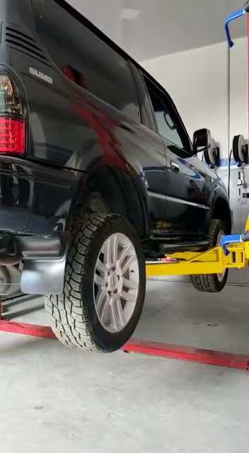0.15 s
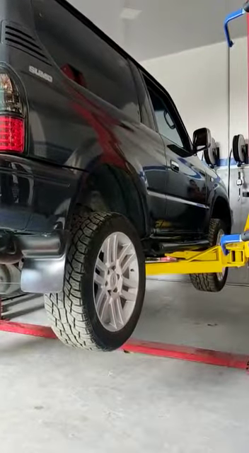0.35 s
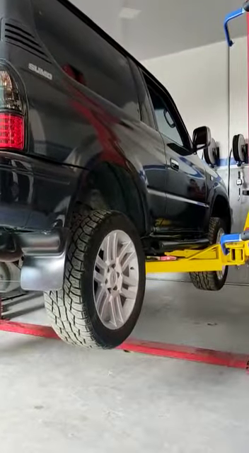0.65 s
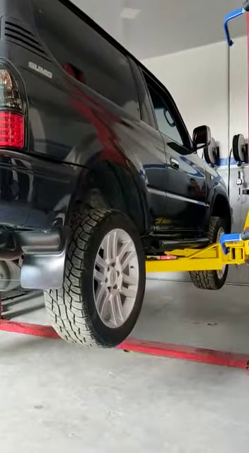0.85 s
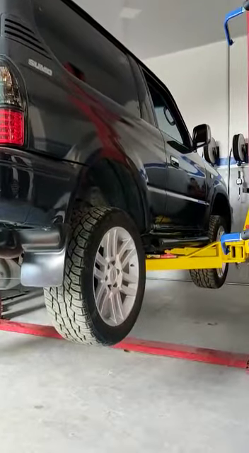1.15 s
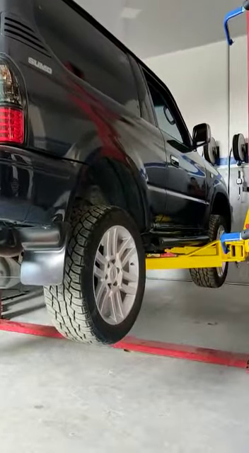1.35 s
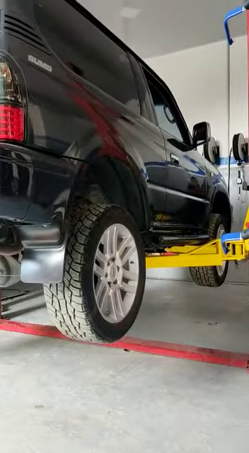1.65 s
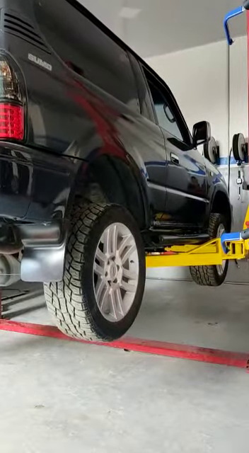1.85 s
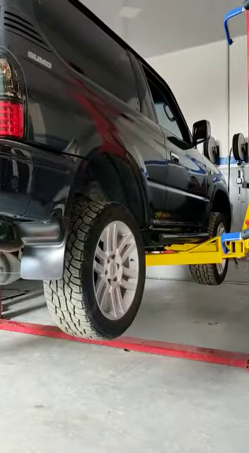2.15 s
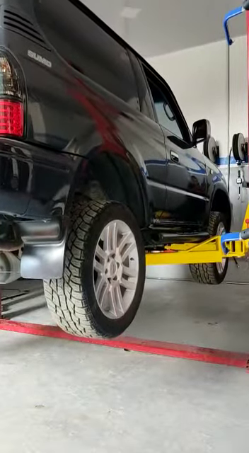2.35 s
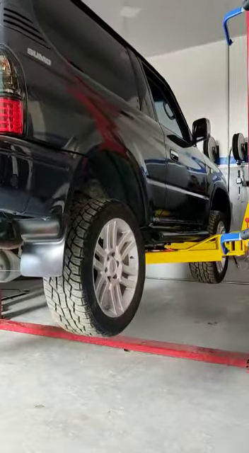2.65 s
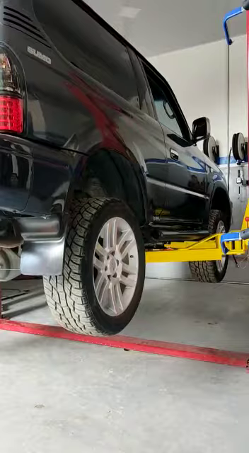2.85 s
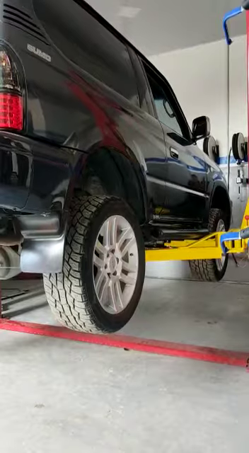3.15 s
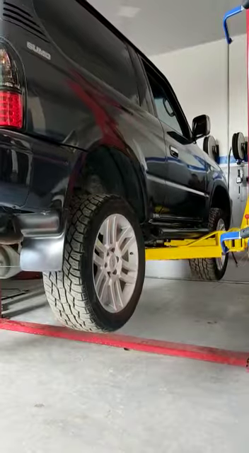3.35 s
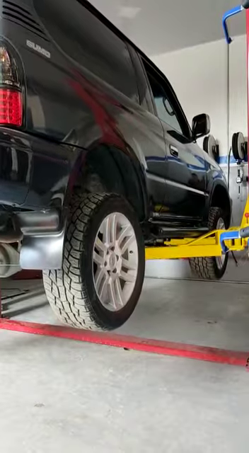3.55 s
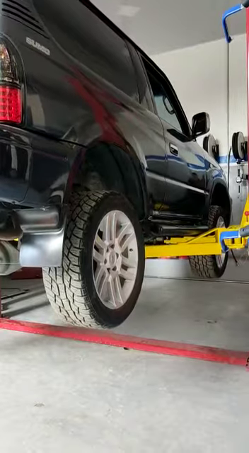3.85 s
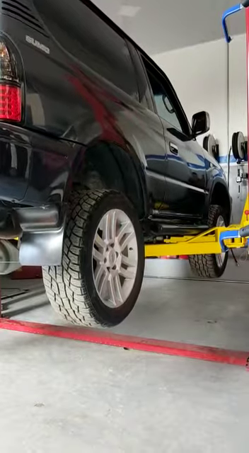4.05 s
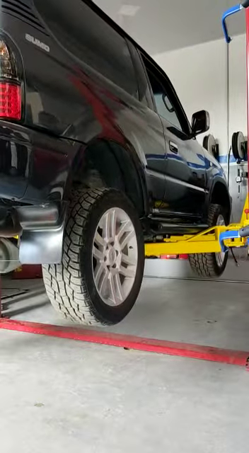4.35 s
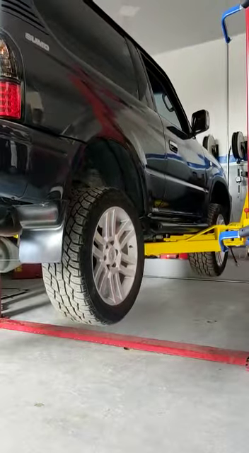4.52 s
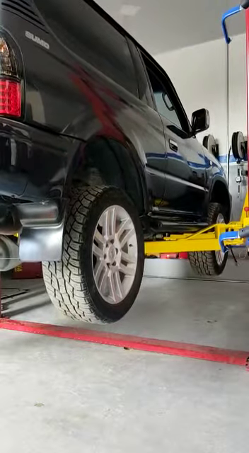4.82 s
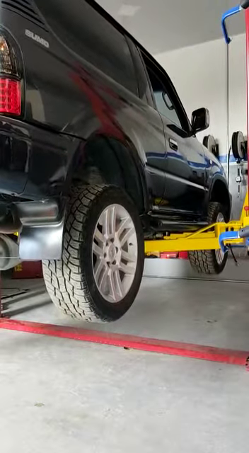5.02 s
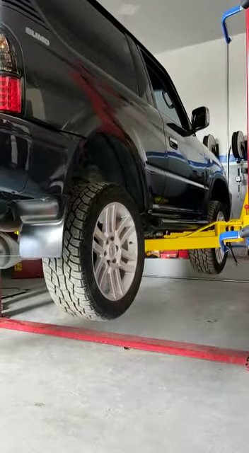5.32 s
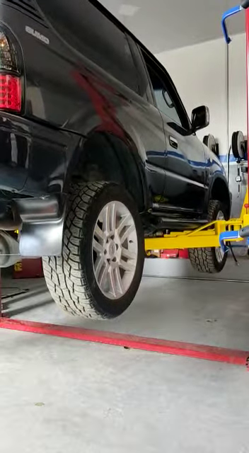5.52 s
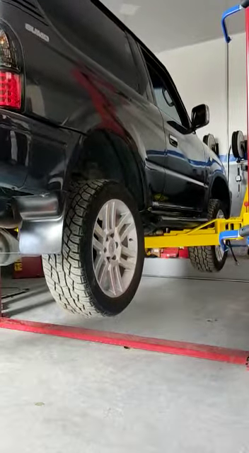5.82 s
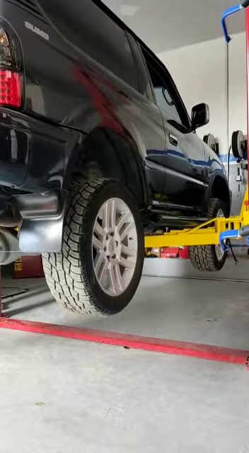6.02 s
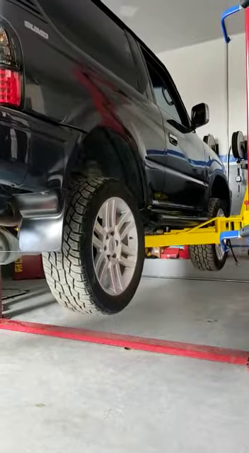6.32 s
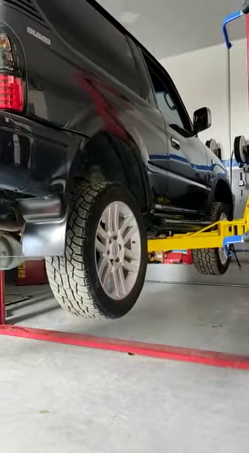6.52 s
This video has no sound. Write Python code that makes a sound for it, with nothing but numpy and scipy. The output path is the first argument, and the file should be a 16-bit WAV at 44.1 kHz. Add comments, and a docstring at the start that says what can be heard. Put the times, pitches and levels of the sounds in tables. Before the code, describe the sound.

A car lift rises in a hard-walled workshop. Throughout, an electric motor hums at low pitch, and its hydraulic gear pump whines steadily around 530 Hz with rough, shrill harmonics up to about 7 kHz and a rushing oil hiss; the tone shimmers and shifts gently between left and right. At 0 s the ring of an earlier clank is dying away, with a soft puff of air on the microphone. Around 1.4 s a thin, very high squeal slips past, faint and leaning left. At 1.93 s a sharp steel latch clank cracks loudly, answered at 2.15 s by the other post, both ringing and echoing for about a second. The pair repeats at 4.44 and 4.67 s. Each blow briefly pushes the whine down before it recovers. Low wind rumble comes and goes, with a bump near 3.9 s and a flurry of buffets from 5.9 to 6.4 s, still rumbling strongly at the end.

```python
"""In a hard-walled workshop, a two-post car lift raises a vehicle.
A draught buffets the microphone: noise shaped by gust curves. A sliding guide squeals once: a rough sine.
The induction motor hums at multiples of 120 Hz; its nine-tooth gear pump whines at multiples of the shaft rate.
About every 2.5 s each post's safety latch drops into a notch: noise cracks, ringing column modes and a hall tail.
Gain control ducks whatever is loud, the clanks most of all."""
import sys
import numpy as np
from scipy import signal
from scipy.fft import rfft, irfft
from scipy.io import wavfile
from scipy.ndimage import uniform_filter1d, minimum_filter1d

SR = 44100
rng = np.random.default_rng(int(sys.argv[2]) if len(sys.argv) > 2 else 0)


def generate_wav(sig):
    """Save sig (samples, or channels by samples) to the path in sys.argv[1] as 16-bit PCM at SR."""
    pcm = np.round(np.clip(np.atleast_2d(sig).T, -1, 1) * 32767).astype(np.int16)
    wavfile.write(sys.argv[1], SR, pcm)


N = 294588
TIME = np.arange(N) / SR


def amp(db):
    """Decibels to gain."""
    return 10 ** (np.asarray(db) / 20)


def unit(x):
    """Scales to rms 1."""
    return x / np.sqrt(np.mean(abs(x) ** 2) + 1e-20)


def read(points, hz):
    """Reads a table on a log-frequency axis."""
    f, value = np.transpose(points)
    return np.interp(np.log(hz + 1), np.log(f + 1), value)


def follow(points, t):
    """Reads each column of a table of curves at the times t."""
    s, *columns = np.transpose(points)
    return [np.interp(t, s, column) for column in columns]


def add(mix, s, sound):
    """Mixes a stereo sound in at time s."""
    part = mix[:, max(round(s * SR), 0):][:, :sound.shape[1]]
    part += sound[:, :part.shape[1]]


def drift(rate_hz):
    """Smooth random wander of rms 1, fading out above about the given rate."""
    size, slow_rate = 4096, 400  # samples, samples per second
    hz = np.fft.rfftfreq(size, 1 / slow_rate)
    slow = irfft(rfft(rng.standard_normal(size)) * np.exp(-(hz / rate_hz) ** 2))
    return np.interp(TIME, np.arange(size) / slow_rate, unit(slow))


# balance of the two microphone ports: pitch_hz [Hz], left_over_right_db [dB]
PORT_BALANCE = [(30, -1), (150, -5), (400, 1), (1200, 1), (2700, 1.5), (4200, -4.5), (5800, -0.5),
                (6800, -3), (7400, -12.5), (8000, 5), (8700, 17), (12000, 6)]
# how alike the ports hear diffuse noise: pitch_hz [Hz], likeness [0 to 1]
PORT_LIKENESS = [(30, 0.36), (130, 0.23), (220, 0.42), (500, 0.35), (1000, 0), (16000, 0)]


def noise(spectrum, size=N):
    """Diffuse noise with the given density, as the two ports pick it up."""
    hz = np.fft.rfftfreq(size, 1 / SR)
    first, other = rfft(rng.standard_normal((2, size)))
    same = read(PORT_LIKENESS, hz)
    pair = np.array([first, same * first + np.sqrt(1 - same ** 2) * other])
    pair = pair * amp(np.outer([.5, -.5], read(PORT_BALANCE, hz)))
    return irfft(pair * amp(read(spectrum, hz)), size) * np.sqrt(SR / 2)


# strength of the draught, before its trim and random gusts: start_s [s], level_db [dB]
DRAUGHT_STRENGTH = [(0, -43), (.65, -37), (1.3, -42.5), (1.7, -33), (2.25, -34.5), (2.5, -31), (2.7, -37),
                    (3.7, -35.5), (3.92, -27.5), (4.8, -43.5), (5.4, -33.5), (5.9, -34), (6.25, -30),
                    (6.68, -25.5)]
# colour of the rumble, scaled to rms 1 before use: pitch_hz [Hz], density_db [relative dB per Hz]
RUMBLE_COLOUR = [(10, 1.5), (25, -10), (60, 2), (120, -2.5), (190, 1), (300, -6.5), (600, -18.5),
                 (1500, -111)]
# sharper buffets: peak_s [s], level_db [dB], length_s [s from the peak to 1/e]
BUFFET_TIMES = [(0.055, -17, 0.0074), (0.232, -30, 0.048), (0.68, -26, 0.033), (0.992, -25, 0.045),
                (1.112, -25, 0.017), (2.536, -29, 0.06), (3.02, -26, 0.09), (3.515, -25, 0.032),
                (3.906, -24, 0.073), (4.172, -29.5, 0.11), (5.346, -30, 0.039), (5.524, -25, 0.038),
                (5.66, -26, 0.0091), (5.915, -22.5, 0.012), (6.203, -20.5, 0.015), (6.238, -20, 0.01),
                (6.27, -18, 0.011), (6.307, -15, 0.007), (6.357, -15, 0.013), (6.383, -20, 0.008),
                (6.602, -28, 0.04)]
# colour of a buffet, scaled to rms 1 before use: pitch_hz [Hz], density_db [relative dB per Hz]
BUFFET_COLOUR = [(15, 2.5), (60, -4.5), (180, 1), (300, -5), (550, -12.5), (900, -24.5), (2000, -75)]
# upper part of a quick buffet, scaled to rms 1 before use: pitch_hz [Hz], density_db [relative dB per Hz]
SNAP_COLOUR = [(30, -25), (200, -3), (450, 1), (750, -8), (1100, -14), (2000, -55)]


def draught(rumble_db=1, gust_db=2.5, gust_hz=6, lumpy_db=2, snap_db=-6, snap_s=0.019):
    """Moving air rumbles in random gusts, lumpy at each port; quicker eddies reach higher."""
    gusts_db = follow(DRAUGHT_STRENGTH, TIME)[0] + gust_db * drift(gust_hz)
    port_lumps_db = lumpy_db * np.array([drift(41), drift(28)])
    rumble = unit(noise(RUMBLE_COLOUR)) * amp(rumble_db + gusts_db + port_lumps_db)
    eddies, snaps = np.zeros((2, N))
    for s, db, length in BUFFET_TIMES:
        eddy = amp(db) * np.exp(-((TIME - s) / length) ** 2)
        eddies += eddy
        snaps += eddy / (1 + (length / snap_s) ** 2)  # the shorter the eddy, the more snap
    buffets = unit(noise(BUFFET_COLOUR)) * eddies
    return rumble + buffets + unit(noise(SNAP_COLOUR)) * amp(snap_db) * snaps


# one thin squeal of a sliding guide, before roughness and panning:
# peak_s [s], pitch_hz [Hz], level_db [dB peak], rise_s [s, time constant], fade_s [s, time constant]
GUIDE_SQUEAL = (1.43, 11480, -34, .055, .07)


def squeal(width_hz=110, rough_db=3, glide_hz=350, glide_s=0.055):
    """A rough, very high friction tone that slips down onto its pitch as it swells, then fades."""
    s, hz, db, rise_s, fade_s = GUIDE_SQUEAL
    t = TIME - s
    glide = glide_hz * np.clip(-t / glide_s - 1, 0, 1)  # lands glide_s before the peak
    pitch = hz + glide + width_hz * drift(140)
    tone = np.sin(2 * np.pi * np.cumsum(pitch) / SR)
    envelope = np.exp(np.minimum(t / rise_s, -t / fade_s))
    return tone * envelope * amp(db + rough_db * drift(70)) * amp([[3], [-3]])


# magnetic hum of the motor, before its swells:
# pitch_hz [Hz], level_db [dB], left_over_right_db [dB], port_phase_rad [rad]
HUM_LINES = [(240, -35.5, 3.5, 0.47), (360, -51, 12.5, 0.56), (480, -37, 0.5, 1.5), (600, -41.5, 6, 1.43)]
# swell of each hum line in turn: start_s [s], line_1_db [dB], line_2_db [dB], line_3_db [dB], line_4_db [dB]
HUM_LINE_SWELLS = [(0, 0.79, 0, -3, -9), (.6, 0.49, 0, 2, -13), (1.3, 0.63, 0, -6.5, 0),
                   (1.8, 1, 0, -9, -1), (2.7, 0.77, 0.006, 1.5, 1.5), (3.1, -2.5, 0, -4, -2),
                   (3.8, 2.1, 0, -1.5, 2), (4.3, 0, 0, 3, 1.5), (5.2, -1.03, 0, 4, -2), (5.6, -2, 0, 3, 0),
                   (6.1, -0.23, 0.0055, 3, -17), (6.6, -1.6, 0, 4.5, -3)]


def motor(waver=0.089, wander_rad=0.084, drift_hz=2.5):
    """The stator hums at even multiples of the mains; the lines swell and waver slowly in the room."""
    out = np.zeros((2, N))
    for (hz, db, pan, lag), swell_db in zip(HUM_LINES, follow(HUM_LINE_SWELLS, TIME)):
        *port_waver, wander = [drift(drift_hz) for _ in range(3)]
        phase = 2 * np.pi * (hz * TIME + rng.random()) + wander_rad * wander
        for ear, side in enumerate((.5, -.5)):
            level = np.sqrt(2) * amp(db + swell_db + side * pan) * (1 + waver * port_waver[ear])
            out[ear] += level * np.cos(phase + side * lag)
    return out


SHAFT_HZ, TEETH = 58.93, 9
# pump whine before trim and swells, one row for each multiple of the tooth rate from the first up:
# nine level_db [dB], from four shaft orders below the multiple to four above, then left_over_right_db [dB]
WHINE_ORDERS = [(-60, -60, -48, -43.5, -33.5, -42.5, -76, -62, -61, 3),
                (-55, -54, -57, -50.5, -47.5, -61, -73, -63, -72, 1.5),
                (-85, -62, -53, -56.5, -43.5, -62, -60, -54, -74, 1),
                (-58, -56, -54, -46.5, -51.5, -46.5, -48.5, -87, -69, 4),
                (-64, -49.5, -40.5, -32.5, -46.5, -42, -43.5, -52, -57, 5),
                (-54, -56, -59, -44, -49, -62, -62, -64, -80, 0),
                (-77, -78, -79, -59.5, -51, -71, -68, -84, -86, -3),
                (-79, -80, -77, -86, -55, -62.5, -81, -82, -78, 2),
                (-77, -80, -71, -52, -56.5, -54, -77, -79, -85, -16),
                (-78, -54, -65, -53, -49, -45.5, -57, -61, -64, -1),
                (-51, -46, -54, -37.5, -42, -37, -45.5, -51, -54, -3.5),
                (-48, -53, -63, -34.5, -43, -38.5, -42.5, -44, -51, -7.5),
                (-63, -41, -46, -33.5, -37.5, -33, -48, -45, -52, -8.5),
                (-54, -69, -52, -41, -47.5, -42, -50, -52.5, -61, -3.5),
                (-54, -65, -52, -57, -51, -62, -63, -51.5, -61, -6),
                (-66, -55, -78, -49.5, -48, -58, -59, -64, -62, 1),
                (-62, -53, -68, -57, -48, -54.5, -64, -54, -62, 9)]
# faint orders above those rows, before trim: pitch_hz [Hz], level_db [dB per line]
FAINT_ORDERS = [(9500, -67), (10000, -75), (11000, -67.5), (12500, -83)]
# the pump's tooth tone as the rising vehicle shifts the standing waves:
# start_s [s], level_db [relative dB], left_over_right_db [dB], port_phase_rad [rad]
TOOTH_TONE_PATH = [(.1,-2,1,-2),(.35,-12,10,-1),(.65,0,20,-3),(.9,-3.5,20,0),(1.5,-2.5,11,-7),(1.78,-2.5,4,-4.5),(2.75,0.5,-3,-2.5),(3,1.5,-3,-3),(3.25,2,-1,-3),(3.9,-2.5,-1,-2),(4.25,-3.5,-3,-2),(5.2,-6,10,-0.5),(5.5,-5,6,0),(5.9,2.5,8,0.2),(6.2,0.5,1,1.6),(6.55,-1,10,-1)]
# loud multiples of the tooth rate, near 2.6, 5.8, 6.4 and 6.9 kHz: multiple [count]
LOUD_TOOTH_MULTIPLES = (5, 11, 12, 13)
# swell of the whine around each of them in turn:
# start_s [s], first_db [dB], second_db [dB], third_db [dB], fourth_db [dB]
LOUD_SWELLS = [(0.1, 2.2, -4, 0.5, -6), (0.35, 2.5, -3.3, -1.5, -2.3), (0.65, 0.9, -4.2, 0.5, 1.5),
               (0.9, -2.1, -3.5, -1.13, -0.5), (1.2, 0.4, 0, 0.5, -1.5), (1.5, -0.7, 0, 1.47, 1.5),
               (1.78, 0.8, 2, 3.17, -4), (2.75, -2.7, -6.5, 1.47, 0), (3.0, 0.5, 3, 1.87, 0),
               (3.249, 0.5, 4.5, 3, 0), (3.6, 0, 1.5, -0.5, 3), (3.9, -1, 2.5, -0.63, 1.5),
               (4.25, -2, 2.5, -3, 3.5), (5.2, -3.7, 1.5, 1.5, 0), (5.5, -3, 0, -0.5, 0.5),
               (5.9, -1.2, -2.5, -3, 1.32), (6.25, 0.5, 4.5, -3, 0.5), (6.55, -2, 2.2, -3, -3.5)]
# oil rushing through the pump and valve, before its flutter: pitch_hz [Hz], density_db [dB per Hz]
OIL_HISS = [(30, -57), (120, -61.5), (220, -62), (350, -65), (520, -67.5), (800, -70), (1300, -72.5),
            (2600, -70.5), (3150, -71), (3500, -78.5), (4500, -83), (5700, -71), (7000, -70.5), (9100, -78),
            (10000, -88.5), (12000, -94), (15000, -116)]


def fading_path(hz, pan, depth, rate, path_rad, shimmer, port_lag):
    """Standing waves give a line a steady part, slow fading, a quick shimmer and a slowly turning phase."""
    chance = np.exp(2j * np.pi * rng.random((2, 2, len(rate))))
    right_phase = rng.choice([-1, 1]) * (port_lag + 0.79 * rng.standard_normal())
    steady = np.exp([[0], [1j * right_phase]]) * chance[0, 0, -1]
    slow = unit(np.fft.ifft(chance[0] * np.exp(-(rate / 3.6) ** 2)))
    fast = unit(np.fft.ifft(chance[1] / (1 + (rate / 22) ** 2)))
    turning = unit(np.fft.ifft(chance[1] * np.exp(-(rate / 1.16) ** 2)).real)
    path = unit(steady + depth * slow + np.sqrt(hz / 3500) * shimmer * fast)
    return path * unit(amp([[pan], [0]])) * np.exp(1j * path_rad * np.sqrt(hz / 7000) * turning)


def pump(wander=0.0002545, flutter=0.000371, fading=0.55, loud_fading=0.24, path_rad=0.68,
         shimmer=0.25, port_lag=1.5, whine_db=0.68):
    """Each tooth squeezes out a pulse of oil; uneven teeth add shaft sidebands, and the room fades the lines."""
    turns = np.cumsum(SHAFT_HZ * (1 + wander * drift(1.6) + flutter * drift(21.0))) / SR
    shaft = np.exp(2j * np.pi * turns).astype(np.complex64)
    hop = 256  # samples between the points of a path
    t = np.arange(N // hop + 2) * hop / SR
    tone_db, tone_pan, tone_lag = follow(TOOTH_TONE_PATH, t)
    swell_db = dict(zip(LOUD_TOOTH_MULTIPLES, follow(LOUD_SWELLS, t)))
    rate = np.fft.fftfreq(len(t), hop / SR)
    ramp = (np.arange(hop) / hop).astype(np.float32)
    out, line = np.zeros((2, N), np.float32), shaft ** 6
    for order in range(7, 210):
        line = line * shaft  # one shaft order higher
        tooth, hz = round(order / TEETH), order * SHAFT_HZ
        offset = order - tooth * TEETH
        if tooth <= len(WHINE_ORDERS):
            row = WHINE_ORDERS[tooth - 1]
            db, pan = row[offset + TEETH // 2], row[-1]
        else:
            db, pan = read(FAINT_ORDERS, hz), read(PORT_BALANCE, hz)
        if order == TEETH:  # the tooth tone itself is clean and moves slowly between the ports
            ports = np.array([amp(tone_pan), np.exp(-1j * tone_lag)])
            path = amp(tone_db) * ports / np.sqrt((1 + amp(tone_pan) ** 2) / 2)
        else:
            depth = loud_fading if tooth in LOUD_TOOTH_MULTIPLES else fading
            path = fading_path(hz, pan, depth, rate, path_rad, shimmer, port_lag)
        path = (np.sqrt(2) * path * amp(whine_db + db + swell_db.get(tooth, 0))).astype(np.complex64)
        smooth_path = path[:, :-1, None] + np.diff(path)[..., None] * ramp
        out += (smooth_path.reshape(2, -1)[:, :N] * line).real
    # the oil hisses in step with the shaft
    return out + noise(OIL_HISS) * (1 + 0.06 * shaft.real) * amp(.5 * drift(25))


def from_the_right(pair, share=0.088, delay_s=.0005):
    """Part of what meets the right port arrives at the left one a moment later."""
    late = np.pad(pair[1], (round(delay_s * SR), 0))[:pair.shape[1]]
    return np.array([np.sqrt(1 - share ** 2) * pair[0] + share * late, pair[1]])


def column_ring(modes, ring_db, tilt_db, size, scatter=0.44, beat_hz=7):
    """The steel column rings in decaying modes for one second; each has a close twin that beats with it."""
    ring, early = np.zeros((2, size)), (np.arange(SR) / SR).astype(np.float32)
    for f, db, t60 in modes:
        level = amp(db + ring_db + tilt_db * np.log2(f / 1500))
        decay = np.exp(-float(np.log(1000) / t60) * early)
        twin_hz = beat_hz * rng.choice([-1, 1]) * rng.uniform(0.73, 2.12)
        for weight, shift in ((1, 0), (scatter, twin_hz)):
            # low modes reach both ports nearly alike
            phase = rng.uniform(0, 2 * np.pi) + rng.standard_normal((2, 1)) * f / 800
            turn = float(2 * np.pi * (f * (1 + 0.00192 * rng.standard_normal()) + shift))
            ring[:, :SR] += weight * level * decay * np.sin(turn * early + phase.astype(np.float32))
    return ring


# workshop reverberation: pitch_hz [Hz], t60_s [s]
HALL_DECAY = [(150, 1.54), (240, 1.06), (400, 1.34), (1000, 1.07), (2200, 1.276), (4000, 0.91),
              (8000, 0.72), (11000, 0.37), (14000, 0.42)]


def hall_tail(colour, size, echo_db=1.13):
    """The hall's diffuse tail dies at its own rate in each band, in uneven clusters of wall reflections."""
    hz, at, z = signal.stft(noise(colour, size), SR, nperseg=512)
    decayed = z * amp(-60 * at / read(HALL_DECAY, hz)[:, None])
    tail = signal.istft(decayed, SR, nperseg=512)[1][:, :size]
    return tail * amp(echo_db * drift(29)[:size])


# dense ring of the pawl and rack, before tilt and level: pitch_hz [Hz], density_db [relative dB per Hz]
CLANK_COLOUR = [(100, -72), (170, -46.5), (260, -42), (450, -44), (700, -40.5), (1000, -33.5), (1300, -40),
                (1900, -37.5), (2800, -42), (3400, -49.5), (4400, -49.5), (7600, -42), (9300, -53),
                (11000, -65), (15000, -72)]
# first contact of steel on steel, before level: pitch_hz [Hz], density_db [relative dB per Hz]
CRACK_COLOUR = [(500, -69), (1500, -48), (4400, -53), (7800, -41.5), (9300, -62), (11000, -57),
                (15000, -76)]


def blow(tilt_db, ring_db, crack_db, hall_db, thud_db, modes, direct_db=-3.0, steel_t60=0.25, build_s=0.023,
         clatter_db=3, crack_t60=0.035, thud_hz=265, thud_t60=0.088, strike_rise_s=.003, ring_rise_s=.008):
    """A pawl strikes the rack: a bright crack, a thud, a clattering clank, the column and the hall behind."""
    size = 2 * SR
    t = np.arange(size) / SR
    colour = [(hz, db + tilt_db * np.log2(hz / 1500)) for hz, db in CLANK_COLOUR]
    crack = amp(crack_db - 60 * t / crack_t60) * from_the_right(noise(CRACK_COLOUR, size))
    clatter = clatter_db * np.tanh(drift(120)[:size])
    clank = amp(direct_db - 60 * t / steel_t60 + clatter) * from_the_right(noise(colour, size))
    thud = amp(thud_db - 60 * t / thud_t60) * np.sin(2 * np.pi * thud_hz * t)
    ring = column_ring(modes, ring_db, tilt_db, size) * (1 - np.exp(-t / ring_rise_s))
    hall = amp(hall_db) * hall_tail(colour, size) * (1 - np.exp(-t / build_s))
    return crack + (clank + thud + ring + hall) * (1 - np.exp(-t / strike_rise_s))


# latch blows, levels before the common trim: start_s [s], level_db [dB], treble_tilt_db [dB per octave],
# ring_db [dB], crack_db [dB], hall_db [dB], thud_db [dB], post [1 or 2], notch [1 or 2]
LATCH_BLOWS = [(-.35, 2, -1, -5, -20, -3.5, -30, 2, 1), (1.9, -19, -4, -11, -20, -5, -20, 1, 1),
               (1.929, 5.5, -1.15, -4, -4, -2.5, -22, 1, 1), (2.138, -3, 2, -10, -7, -3.5, -30, 2, 1),
               (2.153, 1, -0.3, -2.5, -13, -4.5, -6.5, 2, 1), (4.413, -24, -7.5, -3, -20, 1, -20, 1, 2),
               (4.441, 6, -0.96, -3, -5.5, -5.5, -24, 1, 2), (4.657, -0.5, -0.1, -12, -4.5, -3, -30, 2, 2),
               (4.673, 2.5, -0.5, -4, -14, -7, -12, 2, 2)]
# modes of the first post's steel column, before slight random detuning:
# pitch_hz [Hz], notch_1_db [relative dB], notch_2_db [relative dB], t60_s [s]
FIRST_POST_MODES = [(205, -10, -27, 0.59), (203, -28, -10.5, 0.62), (251, -17.5, -24, 1),
                    (334, -21, -20, 0.48), (390.6, -12, -23, 0.96), (507, -25, -23, 0.98),
                    (553, -13, -27, 0.97), (639, -41, -26, 1), (760, -19, -32, 0.59), (791, -21, -22, 0.99),
                    (812, -28, -14.5, .8), (862, -12, -13.5, 0.59), (926, -12, -34, 0.91),
                    (964, -11, -30, 0.8), (1070, -13.5, -13.5, 0.86), (1079, -18, -33, 1),
                    (1170, -20, -27, 1), (1178, -21, -20, 0.96), (1297, -14, -31, 0.81),
                    (1553, -26, -16, 1), (1990, -24, -28, 1), (1990, -13, -17, 1), (2093, -26, -18, 1),
                    (2296, -26, -22, 1), (2840, -19, -15, 0.67)]
# modes of the second post's column, likewise:
# pitch_hz [Hz], notch_1_db [relative dB], notch_2_db [relative dB], t60_s [s]
SECOND_POST_MODES = [(212, -16, -12.5, 1.01), (246.5, -21, -26, 1.4), (386, -12.5, -17.5, 0.64),
                     (682, -22, -19, 1), (705, -23.5, -18, 1.2), (764, -16, -13, 1),
                     (965, -13.5, -16, 1.16), (1024, -24, -13.5, 1.3), (1106, -21, -34, 0.67),
                     (1133, -14, -34, 0.87), (1265, -20, -28, 0.91), (1515, -21, -22, 2),
                     (1530, -22, -16, 0.97), (1720, -17, -13, 0.9), (1840, -16, -28, 1.3),
                     (1820, -28, -26, 0.74), (1950, -26, -18, 0.91), (2716, -19, -15.5, 1.2)]


def latches(level_db=1.5):
    """The posts click one just after the other; the notch struck decides which column modes ring most."""
    out = np.zeros((2, N + SR))  # starts a second early: one clank is already dying away
    for s, db, tilt_db, ring_db, crack_db, hall_db, thud_db, post, notch in LATCH_BLOWS:
        column = FIRST_POST_MODES if round(post) == 1 else SECOND_POST_MODES
        modes = [(hz, lower if round(notch) == 1 else upper, t60) for hz, lower, upper, t60 in column]
        strike = blow(tilt_db, ring_db, crack_db, hall_db, thud_db, modes)
        add(out, s + 1, amp(level_db + db) * strike)
    return out[:, SR:]


def scene():
    """Moving air, a sliding guide, the power unit and the latches."""
    return draught() + squeal() + motor() + pump() + latches()


def record(dry, threshold_db=-16, share=0.71, hold_s=0.036, fall_db_per_s=47, ceiling=.88, cut_hz=15450):
    """Gain control takes off a share of the excess level; peaks are rounded off; then the band limit."""
    power = abs(uniform_filter1d((dry ** 2).mean(0), size=600))  # centred, so it looks a moment ahead
    half = int(hold_s * SR / 2)
    level_db = 10 * np.log10(power + 1e-12)
    # the highest level of the past hold_s
    held_db = -minimum_filter1d(-level_db, size=2 * half + 1, origin=half, mode="nearest")
    # after the hold, the sensed level falls no faster than fall_db_per_s
    fall = TIME * fall_db_per_s
    sensed_db = np.maximum.accumulate(held_db + fall) - fall
    over_db = np.maximum(sensed_db - threshold_db, 0)
    ducked = dry * amp(-share * uniform_filter1d(over_db, size=200))
    rounded = ducked / (1 + (ducked / ceiling) ** 6) ** (1 / 6)
    low_pass = signal.firwin(511, cut_hz, window=("kaiser", 9), fs=SR)
    return signal.oaconvolve(rounded, low_pass[None], "same")


dry = scene()
out = record(dry)
generate_wav(out)
```